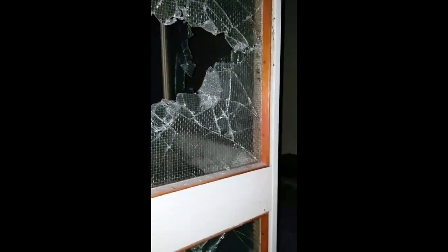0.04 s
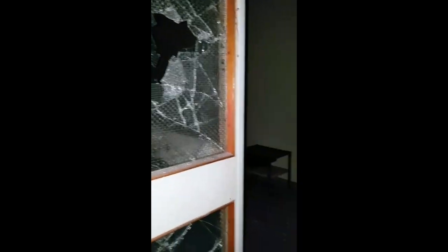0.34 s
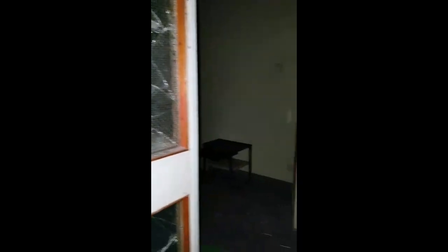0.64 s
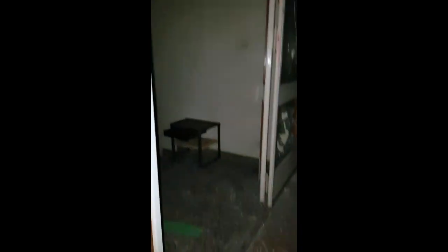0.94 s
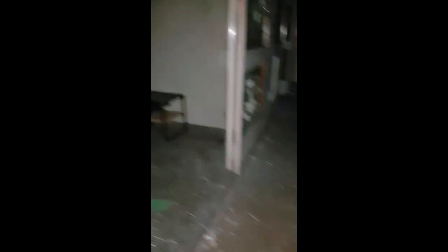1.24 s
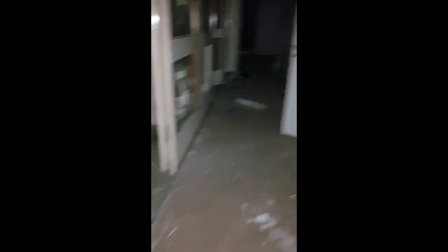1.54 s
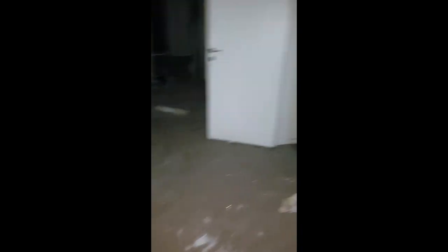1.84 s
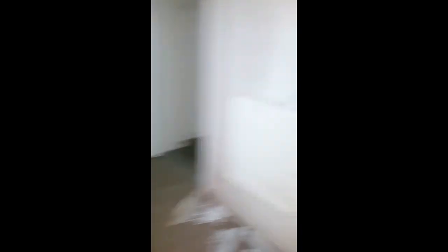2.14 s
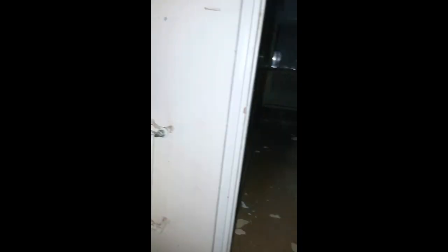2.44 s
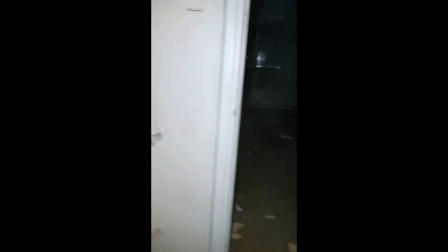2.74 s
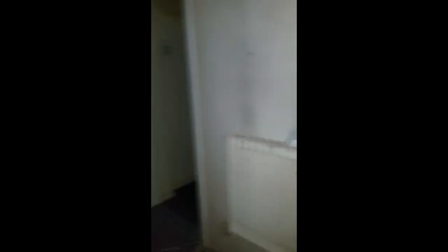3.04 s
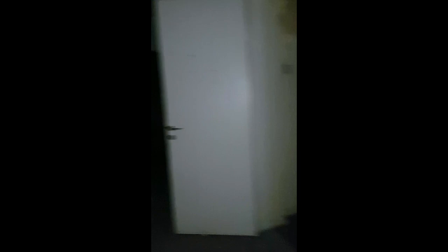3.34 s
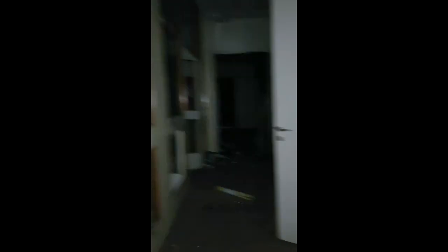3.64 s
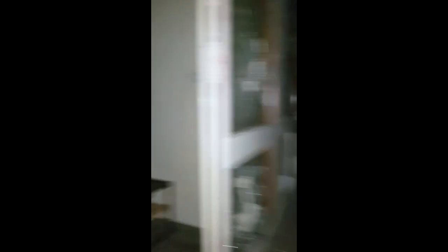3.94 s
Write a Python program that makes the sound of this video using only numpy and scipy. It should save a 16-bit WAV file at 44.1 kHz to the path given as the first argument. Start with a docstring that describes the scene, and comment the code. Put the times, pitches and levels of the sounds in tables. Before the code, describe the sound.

Two slow, close footsteps crush broken glass, the second louder and grinding into the floor. The hard corridor walls ring briefly, while a deep machine hum swells and fades over steady rumble and thin hiss.

```python
"""A bare corridor: two slow steps on broken glass.
A deep machine hum, rumble and thin hiss fill the building; the hum swells and fades as the walker
crosses its standing waves. Grit shifts under the shoe, then shards snap in runs of tiny splits,
ring and grind into the floor. The hard walls ring on after them, more briefly beside an open door."""
import sys
import numpy as np
from scipy import signal
from scipy.fft import rfft, irfft
from scipy.io import wavfile
from scipy.ndimage import uniform_filter1d

SR = 44100
rng = np.random.default_rng(int(sys.argv[2]) if len(sys.argv) > 2 else 0)


def waveform_to_disk(signal):
    """Save audio, clipped to [-1, 1], as 16-bit WAV at the path in sys.argv[1]."""
    frames = np.transpose(np.atleast_2d(signal))
    scaled = np.clip(frames, -1, 1) * 32767
    samples = np.round(scaled).astype(np.int16)
    wavfile.write(sys.argv[1], SR, samples)


N = 176400
BIN_HZ = np.fft.rfftfreq(N, 1 / SR)


def amp(db):
    """Decibels to gain."""
    return 10 ** (np.asarray(db) / 20)


def unit_rms(x):
    """Scales to rms 1."""
    return x / np.sqrt(np.mean(x ** 2) + 1e-20)


def at_hz(points, hz):
    """Interpolates a table over log frequency."""
    f, value = np.transpose(points)
    return np.interp(np.log(hz + 1), np.log(f + 1), value)


def curve(points):
    """Interpolates a time table per sample."""
    return np.interp(np.arange(N) / SR, *np.transpose(points))


def add(mix, start_s, sound):
    """Mixes a stereo sound in."""
    part = mix[:, round(start_s * SR):][:, :sound.shape[1]]
    part += sound[:, :part.shape[1]]


def panned(db):
    """Constant-power stereo gains; positive dB is left."""
    gains = amp(np.array([db, -db]) / 2).reshape(2, -1)
    return gains / np.sqrt((gains ** 2).mean(0))


def equalised(x, points):
    """Applies a gain table over frequency."""
    return irfft(rfft(x) * amp(at_hz(points, BIN_HZ)), N)


def coloured(x, points):
    """Shapes the spectrum, at rms 1."""
    return unit_rms(equalised(x, points))


def correlated(a, b, likeness):
    """Stereo pair of given correlation from two independent noises."""
    return np.array([a, likeness * a + np.sqrt(1 - likeness ** 2) * b])


def minimum_phase(db):
    """Per-ear response of the sharpest click with this spectrum."""
    log_gain = np.log(amp(np.hstack([db, db[:, -2:0:-1]])))
    return np.exp(np.conj(signal.hilbert(log_gain)))[:, :db.shape[1]]


# Standing waves along the walk: (time [s], relative level [dB])
HUM_LEVEL = [(0, -27.5), (.37, -13.5), (.69, -14.5), (.84, -24), (1.25, -13), (1.5, -22), (1.98, -11),
             (2.27, -23.5), (2.47, -11.5), (2.68, -8.5), (3.0, -19), (3.25, -9.5), (3.51, -9), (3.8, -20.5)]
# Hum balance: (time [s], left-right [dB])
HUM_PAN = [(0, -22), (.18, 17), (.55, -5), (1.25, 11.5), (1.8, -1), (2.9, -5), (3.3, 0), (4, -4)]
# Weaker machine tones: (frequency [Hz], level [dB])
MACHINE_TONES = [(61, -27), (173, -32), (243, -35), (363, -42.5), (804, -55.5)]


def machine_hum(hum_hz=50.1, right_lead_rad=.6, trim_db=-.2, wander_hz=1.47):
    """One deep tone heard through its standing waves; weaker ones wander in level and phase."""
    t = np.arange(N) / SR
    out = np.sqrt(2) * np.sin(2 * np.pi * hum_hz * t + np.array([[0], [right_lead_rad]]))
    out *= amp(curve(HUM_LEVEL) + trim_db) * panned(curve(HUM_PAN))
    slow_band = np.exp(-(np.fft.fftfreq(N, 1 / SR) / wander_hz) ** 2)
    for hz, db in MACHINE_TONES:
        wander = np.fft.ifft(slow_band * np.exp(2j * np.pi * rng.random((3, N))))  # left, right, shared
        tone = (wander[:2] + wander[2]) * np.exp(2j * np.pi * hz * t)
        out += amp(db) * unit_rms(tone.real)
    return out


# Rumble spectrum, bass and upper part: (frequency [Hz], relative density [dB])
RUMBLE_LOW = [(20, -30), (37, -26), (44, -8), (58, -6)]
RUMBLE_HIGH = [(68, 0), (170, -2), (260, -7), (400, -14), (600, -23), (1000, -31), (1500, -37.5),
               (2500, -56.5), (6000, -70)]
# Likeness of the ears: (frequency [Hz], correlation [0-1])
RUMBLE_CORRELATION = [(30, 1), (70, 0.24), (130, 0.42), (600, 0.19), (1200, 0.18)]
# Rumble drift: (time [s], gain [dB])
RUMBLE_DRIFT = [(0, 0.6), (2, 0.23), (4, -1.64)]


def rumble(level_db=-21.5):
    """The building's rumble, nearly mono in the deepest bass."""
    a, b = rfft(rng.standard_normal((2, N)))
    noise = irfft(correlated(a, b, at_hz(RUMBLE_CORRELATION, BIN_HZ)), N)
    return coloured(noise, RUMBLE_LOW + RUMBLE_HIGH) * amp(level_db + curve(RUMBLE_DRIFT))


# Boom spectrum: (frequency [Hz], relative density [dB])
BOOM_SPECTRUM = [(40, -56), (90, -34), (135, -0.5), (175, 2.5), (220, -17), (300, -29), (480, -17),
                 (650, -25.5), (2000, -64)]
# Boom along the walk: (time [s], level [dB])
BOOM_ENVELOPE = [(0, -22), (1.4, -28), (2.2, -40), (4, -32.5)]


def boom():
    """Hollow low noise that fades along the walk and partly returns."""
    noise = rng.standard_normal((2, N)) + rng.standard_normal(N)
    return coloured(noise, BOOM_SPECTRUM) * amp(curve(BOOM_ENVELOPE))


# Hiss spectrum: (frequency [Hz], relative density [dB])
HISS_SPECTRUM = [(300, -10), (1200, -2.5), (2300, 2), (4000, -5.5), (7000, -13), (14000, -23)]
# Hiss along the walk: (time [s], level [dB])
HISS_ENVELOPE = [(0, -54), (.7, -58.5), (1.0, -52), (1.35, -50.5), (2.5, -47), (3.2, -44.5), (4, -43.5)]


def hiss():
    """Thin noise, independent at each ear, slowly growing."""
    return coloured(rng.standard_normal((2, N)), HISS_SPECTRUM) * amp(curve(HISS_ENVELOPE))


# Grit spectrum: (frequency [Hz], relative density [dB])
GRIT_SPECTRUM = [(1000, -24), (3500, -5), (7000, -3), (11500, 5), (15000, -5)]
# Grit shifting, most before the first step: (time [s], level [dB])
GRIT_ENVELOPE = [(.82, -79), (.95, -66), (1.15, -60), (1.3, -54.5), (1.48, -70), (4, -60)]


def grit(grains_per_s=2000, spread_db=3):
    """Fine grains crackle faintly under the sole."""
    sizes = amp(spread_db * np.minimum(rng.exponential(1, (2, N)), 5))
    hits = rng.random((2, N)) < grains_per_s / SR
    grains = sizes * hits * rng.choice([-1, 1], (2, N))
    return coloured(grains, GRIT_SPECTRUM) * amp(curve(GRIT_ENVELOPE))


def crack(length_s, level_db, body_hz, knock_db, ring_db, fizz_db):
    """Tiny splits ring shard and floor; returns the direct sound and a smoother one for the walls."""
    splits_per_s, spread_db, fade_db, main_db = 2600, 3, -6.5, 3
    attack_share, colour_db, trim_db, n_fft = .17, 1.7, .5, 8192
    n = max(int(length_s * SR), 8)
    progress = np.arange(1, n + 1) / n
    sizes = amp(spread_db * rng.standard_normal(n) + fade_db * progress)
    sizes *= np.minimum(progress / attack_share, 1)
    hits = rng.random(n) < splits_per_s / SR
    a, b = rng.standard_normal((2, n))
    main = n // 4  # one sure, strong split
    hits[main], sizes[main] = True, amp(main_db)
    a[main] = b[main] = 1
    splits = rfft(correlated(a, b, likeness=.15) * sizes * hits, n_fft)

    hz = np.fft.rfftfreq(n_fft, 1 / SR)
    knock = [(45.4, knock_db - 52), (454, knock_db - 16), (830, knock_db), (1280, knock_db)]
    body = [(body_hz * .937, 0), (body_hz * 1.063, 0)]
    treble = [(4930, ring_db), (8300, fizz_db), (15400, fizz_db - 5.5)]
    ripple = unit_rms(np.convolve(rng.standard_normal(len(hz)), np.hanning(90), "same"))
    shape_db = at_hz(knock + body + treble, hz) + level_db + trim_db + colour_db * ripple
    sounds = []
    for bins in (200, 9):  # a narrower average flattens the splits' spectrum more
        power = abs(uniform_filter1d(abs(splits) ** 2, size=bins, axis=1)) + 1e-12
        response = minimum_phase(shape_db - 10 * np.log10(power))
        sounds.append(np.sqrt(SR / 100) * irfft(splits * response))
    return sounds


def reflections(sound, t60_table, rise_s, echoes_per_s, max_t60_s=np.inf):
    """Sparse wall echoes build up, then decay band by band with equal energy per band."""
    taps = rng.standard_normal((2, SR)) * (rng.random((2, SR)) < echoes_per_s / SR)
    hz, t, bands = signal.stft(taps, SR, nperseg=256)
    t60_s = np.clip(at_hz(t60_table, hz), .01, max_t60_s)[:, None]
    tail = signal.istft(bands * amp(-60 * t / t60_s) / np.sqrt(t60_s), SR)[1][:, :SR]
    tail *= 1 - np.exp(-(np.arange(SR) / SR / rise_s) ** 2)
    tail /= np.linalg.norm(tail, axis=1, keepdims=True)
    return signal.fftconvolve(sound, tail, axes=1)


# Shards breaking: (time [s], length [s], body level [dB], body frequency [Hz],
# knock [dB re body], ring [dB re body], fizz [dB re body], left-right [dB])
SHARD_CRACKS = [(1.558, 0.0044, -20, 2130, -20, -22, -29, 6), (1.569, 0.006, -25.5, 3300, -18, 4, -6, 1),
                (1.578, 0.033, -13.5, 2520, -11, -3, 4, 4.5), (1.7041, 0.0046, -10, 2230, 0, -16.5, -28, 2),
                (1.721, 0.003, -19.5, 2770, -16, -23, -7, -10), (1.8, 0.0035, -18, 1880, 2.5, -12, -8.5, 2),
                (1.875, 0.0032, -25, 3070, -25, -7, -5, -5), (1.941, 0.0044, -17, 3290, -32, -6, -7.5, 0.5),
                (2.032, 0.0031, -23, 2110, -11, -5, -4.5, 6), (2.044, 0.0033, -29, 3250, -8, 4, 4.5, 0),
                (2.065, 0.012, -30.5, 3000, -6, 3, -5, -5), (2.085, 0.0018, -27.5, 3300, -25, 0, -5, -11),
                (2.149, 0.0024, -20, 2090, -23, -11, 0.5, 13), (2.16, 0.003, -22, 1890, -26, -20, -3, 11),
                (2.19, 0.0027, -30, 1900, -27, -9, 3.5, 4),
                (2.254, 0.0033, -27.5, 3050, -13, -12, -1.5, -3),
                (2.2861, 0.002, -24.5, 2090, -14, -3.5, -5, 15),
                (2.289, 0.011, -39.5, 2100, -8, 7, 20.5, 11), (2.317, 0.003, -24.5, 3000, -30, -9, -31, 14),
                (2.468, 0.0091, -21.5, 3120, -21, -11, -1.5, -1), (2.637, 0.003, -36, 1900, -3, -15, 0, -4),
                (2.662, 0.004, -34, 1900, -3, -2, -20, 0), (2.69, 0.008, -44, 3000, -10, 4, 7.5, -1),
                (2.813, 0.0098, -20.5, 3300, -22, 1, -11, 2),
                (2.823, 0.012, -11, 3050, -29, -1.5, -4.5, 0.5),
                (2.861, 0.008, -23.5, 2120, -23, 8.5, 7, 6), (2.864, 0.016, -18, 2230, -16, 2.5, 5.5, 0),
                (2.976, 0.0032, -16.5, 1860, -12, -2.5, -1.5, 0),
                (2.985, 0.0069, -19.5, 1870, -3, 6, 0.5, 7), (3.042, 0.0033, -9, 1980, -29, -23, -10, 23),
                (3.056, 0.0063, -20, 1960, -25, -4, 4, 6), (3.069, 0.13, -17.5, 2170, -28, -11, -5.5, -1),
                (3.198, 0.0042, -13, 2430, -31, -10, -8, -3), (3.316, 0.006, -8.5, 2270, -26, -12, -6.5, 3),
                (3.323, 0.013, -11.5, 2800, -22, -13.5, -8, 3),
                (3.361, 0.062, -16.5, 2150, -40, -8.5, -21, 2),
                (3.4583, 0.0032, -17.5, 2240, -29, -13, -35, 5),
                (3.463, 0.039, -11.5, 3350, -22, -7.5, -23, 4),
                (3.539, 0.039, -19, 3000, -7, -0.5, -0.5, 4), (3.644, 0.0022, -35, 2300, 3, 4.5, 12, 12),
                (3.656, 0.006, -37, 2090, -13, -28, 5, 8), (3.894, 0.004, -43, 2100, -16, -16, 7.5, 2)]
# Corridor decay: (frequency [Hz], T60 [s])
CORRIDOR_T60 = [(1300, 0.7), (2400, 0.82), (4500, 0.5), (8000, 0.65), (14000, 0.2)]
# Corridor colour: (frequency [Hz], gain [dB])
CORRIDOR_EQ = [(500, -25), (1300, 0), (2400, 0), (4500, 2.5), (9000, -3.5), (14000, 1)]
# Corridor response, drier beside the door: (time [s], gain [dB])
CORRIDOR_SEND = [(2.15, 0.5), (2.55, -6.5), (2.85, -0.5), (3.4, 1.5), (3.65, -7)]


def breaking_glass(ear_delay_s=.0004, near_db=-5.5, corridor_db=-.5, corridor_pan_db=3.5):
    """Each break arrives directly, off the nearby door and walls, and down the corridor."""
    close, far = np.zeros((2, 2, N))
    for start_s, *shard, pan_db in SHARD_CRACKS:
        direct, radiated = crack(*shard)
        direct[0] = np.roll(direct[0], round(ear_delay_s * SR))
        add(close, start_s, direct * panned(pan_db))
        early = reflections(radiated, [(1000, .1)], rise_s=.0045, echoes_per_s=1400)
        add(close, start_s, amp(near_db) * early)
        limit_s = .34 if 2.0 < start_s < 2.7 else np.inf  # the open door screens off the long echo
        late = reflections(radiated, CORRIDOR_T60, rise_s=.008, echoes_per_s=3500, max_t60_s=limit_s)
        send_db = np.interp(start_s, *np.transpose(CORRIDOR_SEND))
        add(far, start_s, amp(send_db) * late)
    return close + amp(corridor_db) * panned(corridor_pan_db) * equalised(far, CORRIDOR_EQ)


# Modes of larger shards: (time [s], press time [s], frequency [Hz], level before decay [dB], T60 [s])
SHARD_MODES = [(1.574, .004, 1776, -33, .3), (1.582, .008, 2525, -25, .18), (1.582, .008, 2649, -22, .17),
               (1.802, .02, 1790, -36, .35), (2.149, .001, 2200, -16.5, .016)]


def ringing_shards():
    """Each mode swells as its shard is pressed and dies away."""
    out = np.zeros((2, N))
    t = np.arange(SR // 2) / SR
    for start_s, press_s, hz, db, t60_s in SHARD_MODES:
        envelope = amp(db - 60 * t / t60_s) * np.minimum(t / press_s, 1)
        phase_cycles = rng.random((2, 1)) / 4
        add(out, start_s, envelope * np.sin(2 * np.pi * (hz * t + phase_cycles)))
    return out


# Sole grinding shards into the floor: (time [s], length [s], start pitch [Hz], end pitch [Hz], level [dB])
SOLE_GRINDS = [(3.045, .17, 2150, 2050, -33.5), (3.32, .14, 2650, 2350, -33)]


def grinding_shards(slips_per_s=700, bandwidth_hz=850):
    """Uneven slips ring a broad resonance that sinks as the weight comes on."""
    out = np.zeros((2, N))
    pole = np.exp(-np.pi * bandwidth_hz / SR)
    for start_s, length_s, start_hz, end_hz, db in SOLE_GRINDS:
        n = int(length_s * SR)
        slips = rng.standard_normal((2, n)) * (rng.random(n) < slips_per_s / SR)
        glide = np.exp(2j * np.pi * np.cumsum(np.linspace(start_hz, end_hz, n)) / SR)
        resonance = (glide * signal.lfilter([1], np.poly([pole, pole]), slips / glide)).real
        add(out, start_s, amp(db) * unit_rms(resonance * np.hanning(n) ** .5))
    return out


def scene():
    """Glass and grit underfoot, over the hum and noise of the building."""
    steps = breaking_glass() + ringing_shards() + grinding_shards() + grit()
    return steps + machine_hum() + rumble() + boom() + hiss()


def record(dry):
    """Low cut, overload ceiling, band limit."""
    low_cut_hz, ceiling, high_cut_hz = 36, .85, 14750
    highpass = signal.butter(6, low_cut_hz, "highpass", fs=SR, output="sos")
    lowpass = signal.firwin(255, high_cut_hz, window=("kaiser", 7), fs=SR)
    clipped = np.clip(signal.sosfiltfilt(highpass, dry, padlen=8000), -ceiling, ceiling)
    return signal.oaconvolve(clipped, lowpass[None], "same")


dry = scene()
out = record(dry)
waveform_to_disk(out)
```